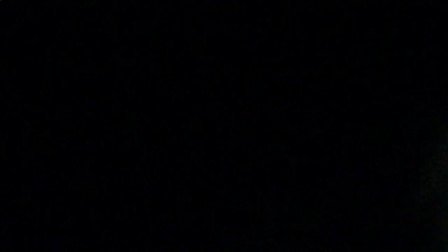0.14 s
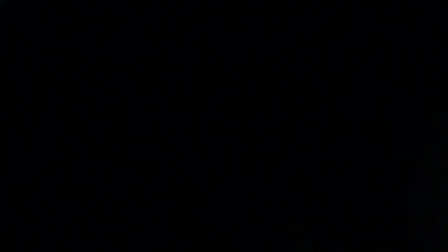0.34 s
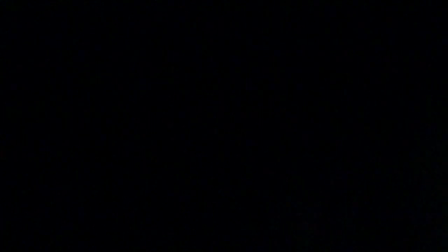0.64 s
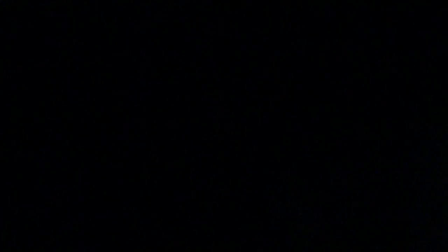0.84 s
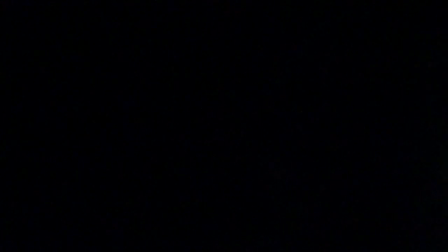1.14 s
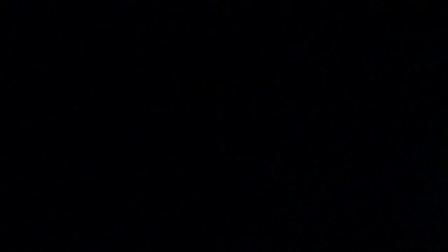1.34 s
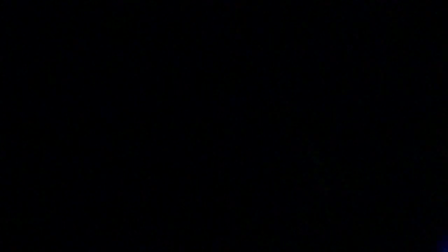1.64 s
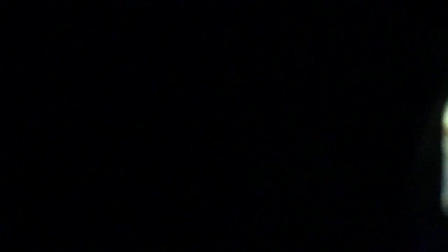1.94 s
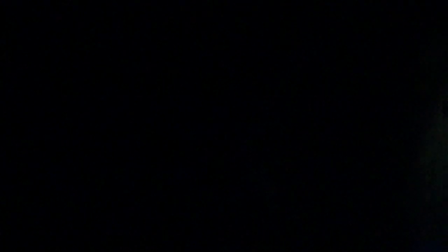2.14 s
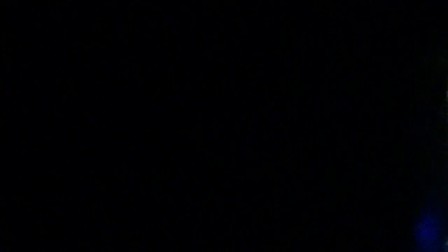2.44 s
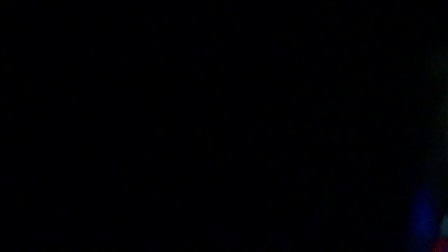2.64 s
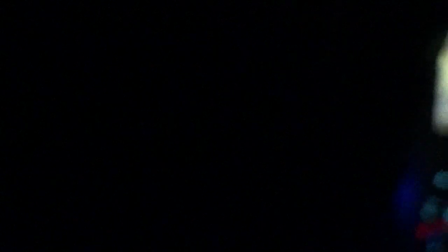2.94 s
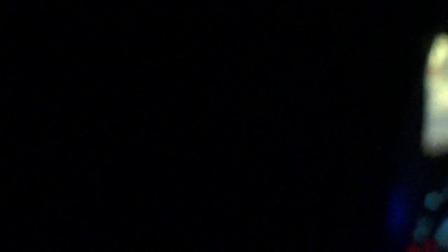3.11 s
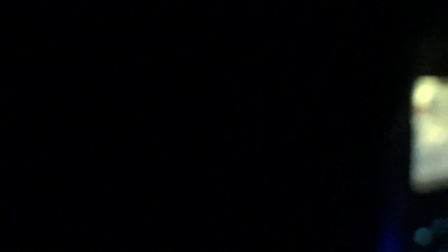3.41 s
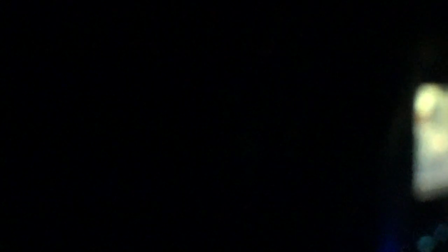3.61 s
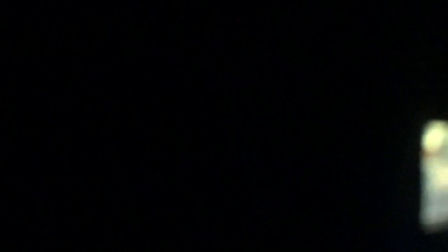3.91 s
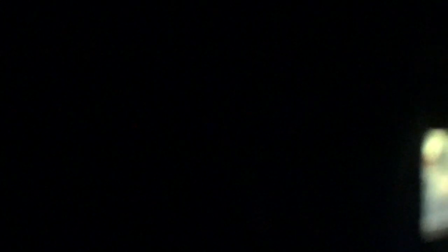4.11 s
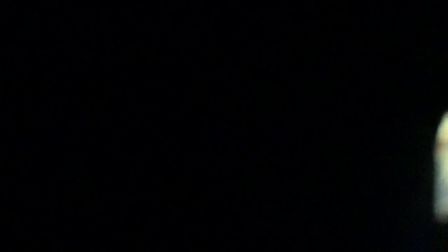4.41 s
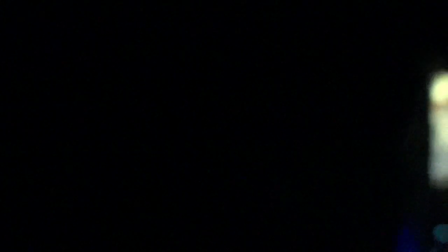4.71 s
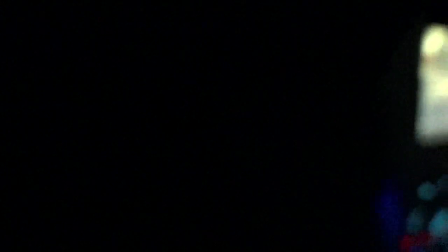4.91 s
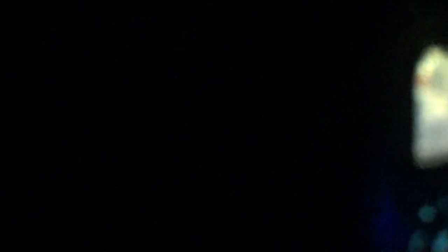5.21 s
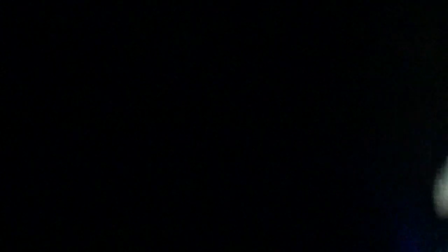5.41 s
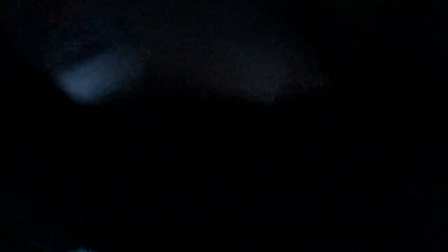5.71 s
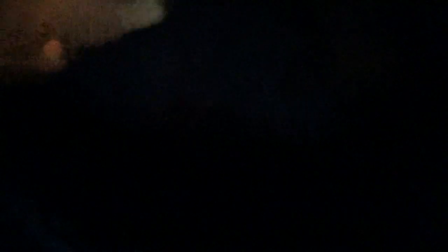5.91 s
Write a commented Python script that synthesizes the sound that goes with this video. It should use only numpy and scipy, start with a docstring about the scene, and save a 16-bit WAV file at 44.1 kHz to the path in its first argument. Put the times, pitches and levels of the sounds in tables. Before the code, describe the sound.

A little plug-in fan runs at constant speed in a small, dry car cabin, heard very close. Air roars softly through its grille over a buzzy, pitched whine, brightness shifting as the handheld microphone moves. Fingers click, knock and scrape hollow plastic in short groups, mostly in the first half. Near the end the airflow broadens and grows as the microphone crosses the stream, over faint low hum and shuffling.

```python
"""In a parked car, a small plug-in heater fan blows steadily: air rushes through its grille over a motor whine.
Filtered turbulence makes the rush, shaft harmonics and a periodic brush scrape the whine.
A drifting microphone shifts the colour of the rush and passes once through the open jet.
Handled plastic clicks, knocks and rubs as decaying modes and shaped noise, and the close cabin answers
briefly; three dry ticks have no answer. Below lie a wavering low hum, a faint rumble and a low shuffling."""
import sys
import numpy as np
from scipy import signal
from scipy.fft import rfft, irfft, next_fast_len
from scipy.io import wavfile
from scipy.ndimage import map_coordinates

SR = 44100
rng = np.random.default_rng(int(sys.argv[2]) if len(sys.argv) > 2 else 0)


def wav_out(sig):
    """Save sig, one row per channel (or a flat mono array), as 16-bit PCM at SR to the path in sys.argv[1]."""
    wavfile.write(sys.argv[1], SR, np.round(np.clip(np.atleast_2d(sig).T, -1, 1) * 32767).astype(np.int16))


N = 266893
TIME = np.arange(N) / SR
TOP_HZ = 11100  # upper limit of the band


def amp(db):
    """Level definition: decibels to amplitude gain."""
    return 10 ** (np.asarray(db) / 20)


def unit(x):
    """Normalisation: scale to rms 1."""
    return x / np.sqrt(np.mean(x ** 2) + 1e-20)


def along(points, hz):
    """Logarithmic frequency scale: (f/Hz, value) points interpolated on it."""
    f, v = np.transpose(points)
    return np.interp(np.log(hz + 1), np.log(f + 1), v)


def curves(rows):
    """Linear interpolation in time: one value per sample for each column after t/s."""
    t, *columns = np.transpose(rows)
    return [np.interp(TIME, t, column) for column in columns]


def wobble(rate):
    """Slow random modulation: a smooth curve through random knots, rate knots a second."""
    knots = rng.standard_normal(int(N * rate / SR) + 4)
    coarse = TIME[::64]
    smooth = map_coordinates(knots, [coarse * rate], mode="mirror")
    return np.interp(TIME, coarse, smooth)


def filtered(x, response):
    """Linear filtering: the spectrum of x times a response of frequency."""
    n = x.shape[-1]
    padded = next_fast_len(n + SR // 8)
    spectrum = rfft(x, padded) * response(np.fft.rfftfreq(padded, 1 / SR))
    return irfft(spectrum, padded)[..., :n]


def colour(points):
    """Spectral envelope: the gain of (f/Hz, level/dB) points."""
    return lambda hz: amp(along(points, hz))


def resonances(modes):
    """Incoherent modal sum: the powers of (f/Hz, width/Hz, level/dB) resonances add."""
    def response(hz):
        power = 0
        for centre, width, db in modes:
            mode = amp(db) * hz * width / (centre ** 2 - hz ** 2 + 1j * hz * width)
            power = power + np.abs(mode) ** 2
        return np.sqrt(power)
    return response


# Likeness of the left and right noise signals: f/Hz, coherence
COHERENCE = [(60, 0.91), (220, 0.95), (470, 0.92), (800, 0.81), (1150, 0.65), (1600, 0.95), (1800, 0.87),
             (2050, 0.61), (3000, 0.72), (5500, 0.66), (8000, 0.77), (11000, 0.91)]


def noise(response, size=N):
    """Partial coherence: independent mid and side noises make coloured stereo noise of rms 1."""
    def mid_and_side(hz):
        turn = np.arccos(np.clip(along(COHERENCE, hz), -1, 1)) / 2
        return response(hz) * np.array([np.cos(turn), np.sin(turn)])
    mid, side = filtered(rng.standard_normal((2, size)), mid_and_side)
    return unit(np.array([mid + side, mid - side]))


def add(track, s, sound):
    """Superposition: mix a sound in at time s."""
    part = track[:, round(s * SR):][:, :sound.shape[-1]]
    part += sound[..., :part.shape[-1]]


# Low cabin hum: f/Hz, level/dB
HUM_TONES = [(97, -61.5), (116, -61)]
# Low rumble in the cabin: t/s, level/dB
RUMBLE_LEVEL = [(0, -69), (4.75, -66), (4.95, -54), (6.05, -57)]
# Relative spectrum of the rumble: f/Hz, level/dB
RUMBLE_SPECTRUM = [(15, -16), (30, -3), (44, -1), (58, -7), (100, -28)]
# Shuffling of the hand that carries the microphone: t/s, level/dB
SHUFFLE_LEVEL = [(0, -65), (2.0, -61), (2.3, -51), (3.3, -53), (3.7, -48), (4.3, -52.5), (5.0, -47.5),
                 (6.05, -47.5)]
# Relative spectrum of the shuffling: f/Hz, level/dB
SHUFFLE_SPECTRUM = [(50, -25), (110, -5.5), (170, -1), (300, 3), (450, -20), (1000, -50)]


def cabin_floor():
    """Superposed background: randomly modulated hum tones over low-frequency rumble and shuffling noise."""
    hum = 0
    for hz, db in HUM_TONES:
        level = amp(db + 1.3 * wobble(3.46))
        hum = hum + level * np.sqrt(2) * np.sin(2 * np.pi * hz * TIME + 2.0 * wobble(3.6))
    shuffle = amp(curves(SHUFFLE_LEVEL)[0] + 1.8 * wobble(9)) * noise(colour(SHUFFLE_SPECTRUM))
    rumble = amp(curves(RUMBLE_LEVEL)[0]) * noise(colour(RUMBLE_SPECTRUM))
    return hum + shuffle + rumble


def cabin(x, t60):
    """Reverberation: glass and upholstery answer with a short, exponentially decaying random tail."""
    t = np.arange(SR // 4) / SR
    tail = rng.standard_normal((2, len(t))) * amp(-60 * t / t60) * (t > .003)
    return signal.fftconvolve(x, tail / np.linalg.norm(tail[0]), axes=1)[:, :N]


# Strokes of fingers on plastic: t/s at the middle, 1/e half length/s, dull rub level/dB, gritty scrape level/dB
RUB_STROKES = [(0.33, 0.081, -30.5, -40), (2.295, 0.04, -27, -33), (2.385, 0.05, -34, -30.5)]
# Relative spectrum of the dull rub: f/Hz, level/dB
RUB_SPECTRUM = [(60, -14), (140, 9), (230, 4), (430, 13), (750, 8.5), (1100, 5.5), (3000, -2), (9000, -22)]
# Relative spectrum of the gritty scrape: f/Hz, level/dB
SCRAPE_SPECTRUM = [(1500, -17), (3500, 3), (5600, 0), (7500, 4), (9200, 6), (11000, -6)]


def rubs(grain_db, grit_db):
    """Stick-slip friction: skin catches and slides, giving dull scuffs under a finer, gritty scrape."""
    dull, gritty = np.zeros(N), np.zeros(N)
    for s, half, rub_db, scrape_db in RUB_STROKES:
        stroke = np.exp(-((TIME - s) / half) ** 2)
        dull += stroke * amp(rub_db)
        gritty += stroke * amp(scrape_db)
    scuffs = dull * unit(amp(grain_db * wobble(150))) * noise(colour(RUB_SPECTRUM))
    scrape = gritty * unit(amp(grit_db * wobble(700))) * noise(colour(SCRAPE_SPECTRUM))
    return scuffs + scrape


# Dull knocks on the casing: t/s, level/dB, f/Hz, thud level/dB, hardness/dB per octave, t60/s
KNOCK_EVENTS = [(.214, -18, 740, -16, -2, 0.044), (.280, -18, 450, -16, 1, .07),
                (.313, -15, 490, -12, -3, .08), (1.53, -23, 420, -5.5, 3, 0.06),
                (2.286, -15.5, 745, -8, -5, .05), (2.305, -22, 805, -4, -10, 0.074),
                (2.370, -13.5, 544, -20, -9, 0.07), (2.380, -8, 477, -22, -9, 0.045),
                (2.391, -18, 594, -3, -10, 0.06), (2.506, -14, 458, -24, 1, 0.092),
                (2.545, -14.5, 472, -24, 4, 0.038), (2.917, -17, 452, -24, -2, 0.049),
                (3.077, -4.5, 485, -13, -7, .045), (3.088, -9.5, 408, -18, -14, .035),
                (3.8, -35, 133, -12, 1, .12), (5.068, -13, 293, -12, -1, 0.036),
                (5.081, -12.5, 514, -6, -1, 0.03)]
# Modes of the casing: multiple of the knock's f, level/dB
CASING_MODES = [(.69, -7.5), (1, 1), (1.24, -5.5), (1.6, -13), (1.97, -6), (2.25, -12)]
# Low push under a knock: f/Hz, level/dB
THUD_TONES = [(120, -4), (178, 1.5), (290, -3)]


def knocks(attack, width_hz, clatter_db, lowest_hz):
    """Modal excitation: a blow rings the hollow casing over a thud; hardness favours upper modes and clatter."""
    track, t = np.zeros((2, N)), np.arange(SR // 6) / SR
    for s, db, hz, thud_db, hard_db, t60 in KNOCK_EVENTS:
        ring = 0
        for ratio, level in CASING_MODES:
            mode_db = level + hard_db * max(np.log2(ratio), 0) + rng.normal(0, 1)
            ring = ring + amp(mode_db) * np.sin(2 * np.pi * ratio * hz * t)
        band = resonances([(hz, width_hz, 0)])
        clatter = amp(clatter_db + hard_db / 2) * noise(lambda f: band(f) ** 2, size=len(t))
        thud = sum(amp(thud_db + level) * np.sin(2 * np.pi * low_hz * t) for low_hz, level in THUD_TONES)
        envelope = amp(db - 60 * t / t60) * (1 - np.exp(-t / attack))
        add(track, s, envelope * (ring + clatter + thud))
    return signal.lfilter(*signal.butter(2, lowest_hz, "highpass", fs=SR), track)


# Light plastic clicks: t/s, level/dB, t60/s, own mode f/Hz, own mode level/dB
CLICK_EVENTS = [(.031, -23, 0.047, 5700, -10), (0.037, -16, 0.036, 6900, -11), (.277, -21, .08, 2930, -5),
                (.284, -25, 0.05, 3890, -7), (.289, -15, 0.028, 1900, -9), (.307, -14, 0.037, 6540, -7),
                (.315, -18, 0.042, 8760, -6), (.387, -22, .04, 3000, -6), (.491, -15.5, 0.046, 3750, -3.5),
                (.493, -26, .05, 1060, 1), (.496, -20, 0.072, 5040, -3.5), (.531, -21, .025, 8300, -10),
                (1.459, -12.5, 0.051, 2884, -9), (1.463, -25, .03, 8200, -7), (1.503, -18, .065, 2910, -6),
                (1.648, -27, .04, 8300, -3), (2.282, -15.5, 0.04, 9000, -10),
                (2.298, -18, 0.071, 7300, -12), (2.334, -18, 0.033, 2960, 0.5),
                (2.371, -20, 0.039, 3600, -2), (2.376, -14.5, 0.043, 3520, -6), (2.386, -30, 0.13, 5670, 1),
                (2.508, -9.5, 0.012, 3760, -12), (2.511, -22, 0.056, 2280, -6),
                (3.074, -18.5, 0.05, 8300, -16), (3.079, -16, 0.042, 1760, -2),
                (3.1007, -16, 0.026, 2140, 2), (3.1, -16, 0.033, 7000, -14), (5.003, -20, 0.045, 7260, -9),
                (5.144, -24, 0.055, 8640, -11), (5.233, -17, 0.04, 2880, -5.5),
                (5.236, -20, .025, 4170, -5)]
# Ringing modes of the plastic: f/Hz, level/dB
PLASTIC_MODES = [(2150, 3), (2860, 12.5), (3100, 8), (3840, 3), (4180, 2.5), (4950, -3), (5760, 3),
                 (6790, -9), (8200, -6.5)]
# Relative spectrum of a contact's snap, before its tilt: f/Hz, level/dB
SNAP_SPECTRUM = [(80, -70), (400, -39), (1500, 0.5), (3500, 8), (8500, 7.5), (11000, -10)]
# a click pitched an octave above the pivot tilts its snap by this many more dB per octave
SNAP_TILT_DB, SNAP_PIVOT_HZ = 7, 4740
RING_DB = -5  # a click's ring over its snap


def clicks(rise, sustain, chatter_db):
    """Impact excitation: a ragged snap rings the plastic, and the part that was hit adds its own note."""
    track, t = np.zeros((2, N)), np.arange(SR // 5) / SR
    for s, db, t60, own_hz, own_db in CLICK_EVENTS:
        ring = 0
        for hz, level in PLASTIC_MODES:
            gain = amp(level + rng.normal(0, 5.8, (2, 1)))
            ring = ring + gain * np.sin(2 * np.pi * (hz * t + rng.random()))
        # higher clicks snap more brightly
        tilt_db = SNAP_TILT_DB * np.log2(own_hz / SNAP_PIVOT_HZ)
        tilted = [(hz, level + tilt_db * np.log2(hz / SNAP_PIVOT_HZ)) for hz, level in SNAP_SPECTRUM]
        chatter = unit(amp(chatter_db * wobble(430)))[:len(t)]
        snap = noise(colour(tilted), size=len(t)) * chatter
        note = np.sqrt(2) * np.sin(2 * np.pi * own_hz * t) * amp(own_db - 60 * t / (sustain * t60))
        burst = (snap + amp(RING_DB) * unit(ring)) * amp(-60 * t / t60) + note
        onset = 1 - np.exp(-t / (rise * t60))  # shorter clicks rise faster
        add(track, s, amp(db) * onset * burst)
    return track


# Very short, dry ticks: t/s, level/dB
TICK_EVENTS = [(2.666, -20), (2.676, -14), (2.6895, -22)]
# Relative spectrum of a tick: f/Hz, level/dB
TICK_SPECTRUM = [(400, -20), (1600, 4), (3000, -2), (5000, 0), (8000, 2), (11000, -9)]


def ticks(t60):
    """Near-field impact: something small and hard snaps at the microphone, too close for the cabin to answer."""
    track, t = np.zeros((2, N)), np.arange(SR // 20) / SR
    for s, db in TICK_EVENTS:
        add(track, s, amp(db - 60 * t / t60) * noise(colour(TICK_SPECTRUM), size=len(t)))
    return track


# How squarely the drifting microphone faces the grille, as the level of its roar: t/s, level/dB
FACING_LEVEL = [(0.0, -24), (0.52, -24), (1.04, -23), (1.84, -23), (2.14, -21), (2.39, -25), (2.86, -31.5),
                (3.32, -25), (3.76, -23.5), (3.91, -21.5), (4.5, -23), (4.92, -26), (5.49, -22.5),
                (5.71, -23.5), (6.05, -30.5)]


def facing():
    """Directivity: dB above or below the average facing of the grille."""
    level_db, = curves(FACING_LEVEL)
    return level_db - level_db.mean()


JET_S, JET_HALF_S = 5.793, 0.37  # middle and 1/e half length of the pass through the jet (s)


def in_jet():
    """Jet profile: a Gaussian in time, near 0 outside the open jet and 1 in its middle."""
    return np.exp(-((TIME - JET_S) / JET_HALF_S) ** 2)


# Grille and housing resonances: f/Hz, width/Hz, level/dB, dB gained per dB of facing
GRILLE_MODES = [(1336, 92, -5.5, 1), (1498, 73, -5, 1.1), (1710, 32, -6, -0.05), (1869, 63, -14, 0.3)]
EDDY_DB, EDDY_RATE = 2, 35  # eddies shake each resonance by itself: depth, knots a second
SWAY_HZ, SWAY_RATE = 22, 14  # and push its pitch about


def grille_roar(front_db):
    """Flow-excited resonance: eddies ring each grille mode in uneven bursts and sway its pitch."""
    roar = 0
    for centre_hz, width_hz, db, grows in GRILLE_MODES:
        mode = resonances([(centre_hz, width_hz, 0)])
        band = noise(lambda hz: mode(hz) * hz ** 4 / (hz ** 4 + 1180.0 ** 4))  # little below 1180 Hz
        swayed = TIME + np.cumsum(SWAY_HZ * wobble(SWAY_RATE)) / SR / centre_hz
        band = np.array([np.interp(swayed % TIME[-1], TIME, side) for side in band])
        bursts = unit(amp(EDDY_DB * wobble(EDDY_RATE)))
        roar = roar + amp(db + grows * front_db) * bursts * band
    return roar


def reflected(x, echo_db, sway, delay):
    """Comb filtering: a nearby panel's copy, its delay (s) wandering with the microphone, sweeps the colour."""
    late = TIME - delay - sway * wobble(1.506)
    return x + amp(echo_db) * np.array([np.interp(late, TIME, side) for side in x])


# Relative spectrum of the broad body: f/Hz, level/dB
BODY_SPECTRUM = [(30, -25), (70, -17), (120, -20.5), (200, -9.5), (260, -5), (340, 2), (480, 0.5),
                 (540, -1), (630, 5.5), (760, 2), (1150, 0), (2000, 2), (3000, -8), (6000, -29.5)]
# Relative spectrum of the hiss: f/Hz, level/dB
HISS_SPECTRUM = [(600, -9), (1500, 16.5), (2000, -1), (2150, 5), (2450, 15.5), (2800, 10), (3100, 5),
                 (3600, 8), (4200, 4.5), (5400, 3), (7000, 2), (9200, -2.5), (10000, -5), (11200, -20)]
# Resonances of the outlet slots: f/Hz, width/Hz, level/dB
SLOT_MODES = [(2550, 240, 2.5), (3716, 54, 4)]
# Relative spectrum of the open jet: f/Hz, level/dB
JET_SPECTRUM = [(300, -31), (500, -14), (610, 11), (720, 4), (900, 5.5), (1050, 4), (1200, 10.5),
                (1450, 7.5), (1800, 14.5), (2150, 4), (2600, -5), (3100, 3), (4000, -4), (4800, -0.5),
                (5150, -3), (5500, -2), (6200, -1.5), (7200, -1.5), (8500, -8), (11000, -13)]
# each layer at the average facing (dB), and the dB it gains per dB of facing
BODY_DB, BODY_GROWS = -30.5, -0.035
GRILLE_DB = -27
HISS_DB, HISS_GROWS = -31, 0.26
SLOT_DB, SLOT_GROWS = -40.5, 1
JET_DB, JET_AWAY_DB = -25.5, -46.5  # the stream: added inside the jet, and present everywhere
JET_HISS_DB, JET_GRILLE_DB, JET_BODY_DB = 3.5, -12, -3  # change of each layer inside the jet


def airflow():
    """Turbulent flow noise: a broad body, ringing grille and slots, edge hiss; position sets the mix."""
    front_db, jet = facing(), in_jet()
    body_db = BODY_DB + BODY_GROWS * front_db + JET_BODY_DB * jet + 0.12 * wobble(7)
    body = amp(body_db) * noise(colour(BODY_SPECTRUM))
    grille = amp(GRILLE_DB + JET_GRILLE_DB * jet) * grille_roar(front_db)
    hiss_db = HISS_DB + HISS_GROWS * front_db + JET_HISS_DB * jet + 0.27 * wobble(4.3)
    hiss = amp(hiss_db) * noise(colour(HISS_SPECTRUM))
    slot_db = SLOT_DB + SLOT_GROWS * front_db + 2.3 * wobble(2.24)
    slots = amp(slot_db) * noise(resonances(SLOT_MODES))
    stream = (amp(JET_AWAY_DB) + amp(JET_DB) * jet) * noise(colour(JET_SPECTRUM))
    edges = reflected(hiss + slots + stream, echo_db=-16, sway=.00012, delay=.0011)
    return body + grille + edges


BLADE_ORDER, LOW_TONE_TOP_ORDER = 20, 9  # multiples of the shaft speed
# the main blade tone beams forward: dB per dB of facing, dB inside the jet, dB of shaking by eddies
BLADE_GROWS, JET_BLADE_DB, BLADE_FLUTTER_DB = 1.64, -2.5, 2.5
# the lowest tones leak from the housing's sides: dB per dB of facing, dB inside the jet
LOW_TONE_GROWS, LOW_TONE_JET_DB = -0.17, -8
JET_TONE_DB = 1  # the other tones inside the jet


def beam(order, front_db, jet):
    """Source directivity: dB by which a harmonic stands out or sinks; the fundamental fills the cabin evenly."""
    if order == 1:
        return 0
    if order == BLADE_ORDER:
        return BLADE_GROWS * front_db + JET_BLADE_DB * jet + BLADE_FLUTTER_DB * wobble(22.19)
    if order <= LOW_TONE_TOP_ORDER:
        return LOW_TONE_GROWS * front_db + LOW_TONE_JET_DB * jet
    return JET_TONE_DB * jet


SHAFT_HZ = 77.145  # mean shaft speed


def harmonic(angle, order, fade_db, flutter_db, spread):
    """Interference: a harmonic fades in standing waves; low ones waver in the draught, high ones differ by ear."""
    ear_phase = spread * np.sqrt(order * SHAFT_HZ / TOP_HZ) * rng.standard_normal((2, 1))
    phase = rng.uniform(0, 2 * np.pi) + ear_phase
    level_db = fade_db * wobble(2.994)
    if order <= LOW_TONE_TOP_ORDER:
        level_db = level_db + flutter_db * wobble(14)
    return unit(amp(level_db)) * np.sqrt(2) * np.sin(order * angle + phase)


# Motor and blade tones: multiple of the shaft speed, level/dB
SHAFT_TONES = [(1, -56.5), (3, -55), (4, -54), (5, -44.5), (9, -42.2), (11, -49), (12, -45), (13, -47),
               (15, -50), (17, -46), (20, -35.3), (21, -44), (25, -35), (29, -40), (30, -47), (32, -43),
               (33, -46), (35, -51), (45, -57), (53, -57), (76, -59), (77, -54), (79, -55), (80, -56),
               (81, -57), (82, -58), (83, -58), (85, -59), (86, -55), (88, -56), (118, -59), (123, -61),
               (140, -62), (142, -64)]
# Relative spectrum of the brush buzz: f/Hz, level/dB
BRUSH_SPECTRUM = [(300, -40), (1500, 0), (3000, 1), (5200, -2), (6200, 1), (9200, -1), (9800, -7),
                  (11000, -8)]


def motor(drift_hz, flutter_hz, buzz_db):
    """Periodicity: rotation gives shaft harmonics, and brushes that scrape alike on every turn."""
    turns = np.cumsum(SHAFT_HZ + drift_hz * wobble(1.514) + flutter_hz * wobble(25.03)) / SR
    angle = 2 * np.pi * turns
    front_db, jet = facing(), in_jet()
    tones = 0
    for order, db in SHAFT_TONES:
        level = amp(db + beam(order, front_db, jet))
        flutter_db = 2.6 * (order > 1)  # the fundamental does not flutter
        tones = tones + level * harmonic(angle, order, fade_db=1.2, flutter_db=flutter_db, spread=0.3)
    # one turn of random-phase scrape for each ear, read again on every turn
    scrape = irfft(np.exp(2j * np.pi * rng.random((2, round(SR / SHAFT_HZ / 2)))))
    buzz = np.array([map_coordinates(one, [turns % 1 * len(one)], mode="grid-wrap") for one in scrape])
    buzz = filtered(buzz + buzz.mean(0), colour(BRUSH_SPECTRUM))
    return tones + amp(buzz_db) * unit(buzz)


SHEEN_FLANK = 0.19  # depth of the troughs beside a lifted band, as a share of its lift


def sheen(x, path, width_hz):
    """Moving reflection colour: a sliding band is lifted between shallow troughs (a negative lift inverts it)."""
    hz, t, z = signal.stft(x, SR, nperseg=512)
    centre, lift_db = [np.interp(t, TIME, curve) for curve in curves(path)]
    away = np.abs(hz[:, None] - centre) / width_hz
    bump = np.exp(-away ** 2) - SHEEN_FLANK * np.exp(-(away - 2) ** 2)
    return signal.istft(z * amp(lift_db * bump), SR, nperseg=512)[1][:, :N]


# Bands that slide and swell as the microphone moves, lowest first: t/s, centre f/Hz, lift level/dB
LOW_BAND = [(0, 2550, 0.5), (1.5, 2550, -1.5), (2.8, 2500, 1), (3.5, 2450, 2), (4.1, 2540, 0.5),
            (4.8, 2550, 1.5), (5.3, 2570, 0), (5.5, 2480, 3), (5.85, 2660, 4), (6.05, 2670, 0)]
# The same around the upper slot resonance: t/s, centre f/Hz, lift level/dB
SLOT_BAND = [(0, 3750, 2.5), (1.0, 3720, 2.5), (1.55, 3750, -2.5), (1.95, 3730, 4), (2.7, 3750, -1.5),
             (3.35, 3750, 4.5), (4.3, 3750, 2), (6.05, 3600, -1)]
# The same in the middle treble: t/s, centre f/Hz, lift level/dB
MID_BAND = [(0, 6850, 2), (.4, 6400, 0), (.68, 5950, 4), (1.1, 6400, 4.5), (1.35, 6400, 2.5),
            (1.6, 6300, 1), (2, 6100, 5), (2.45, 6750, 2), (2.9, 6900, 5), (3.15, 6750, 4), (3.5, 6300, 5),
            (3.8, 5900, 4.5), (4.55, 5880, 4), (4.75, 6100, 3.5), (4.95, 6700, 5), (5.3, 6050, 4),
            (5.75, 6200, 3.5), (6.05, 6500, 1.5)]
# The same in the high treble: t/s, centre f/Hz, lift level/dB
HIGH_BAND = [(0, 9200, 3), (.7, 8650, 2.5), (1.22, 9000, 6.5), (1.5, 9300, 3), (1.9, 8700, 2.5),
             (2.3, 9000, 3), (2.85, 8750, 4.5), (3.1, 9050, 0), (3.28, 9100, 6.5), (3.55, 9100, 5.5),
             (3.8, 9150, 1.8), (4.1, 9550, 3.2), (4.5, 9300, 1), (4.8, 9050, 6), (5.05, 9100, 2),
             (5.6, 9400, 2.2), (6.05, 9500, 5.5)]
# Uneven arrival of the fan's sound at the two ears: f/Hz, left minus right level/dB
EAR_DIFFERENCE = [(400, 0.5), (900, 1.5), (1010, -0.5), (1130, 3.5), (1430, 2.5), (1550, 0), (2150, 0.5),
                  (2500, 3.5), (2850, -1), (3600, 0.5), (11000, 0)]


def heater_fan():
    """Interaural level difference: air and motor, coloured by moving reflections, reach the ears unevenly."""
    fan = airflow() + motor(drift_hz=0.03, flutter_hz=0.057, buzz_db=-42)
    for path, width_hz in (LOW_BAND, 220), (SLOT_BAND, 230), (MID_BAND, 340), (HIGH_BAND, 230):
        fan = sheen(fan, path, width_hz)
    return filtered(fan, lambda hz: amp(along(EAR_DIFFERENCE, hz) * np.array([[.5], [-.5]])))


def scene():
    """Superposition: the cabin floor, the handling with its reverberation, the dry ticks and the fan."""
    handling = clicks(rise=0.055, sustain=1.05, chatter_db=1.5)
    handling = handling + knocks(attack=0.0034, width_hz=900, clatter_db=-3.0, lowest_hz=105)
    handling = handling + rubs(grain_db=-1.0, grit_db=4)
    answer = amp(-11.0) * cabin(handling, t60=0.077)
    return cabin_floor() + handling + answer + ticks(t60=0.0094) + heater_fan()


def record(dry):
    """Band limitation: a very steep low-pass at the upper limit of the band."""
    return filtered(dry, lambda hz: 1 / np.sqrt(1 + (hz / TOP_HZ) ** 360))


dry = scene()
out = record(dry)
wav_out(out)
```